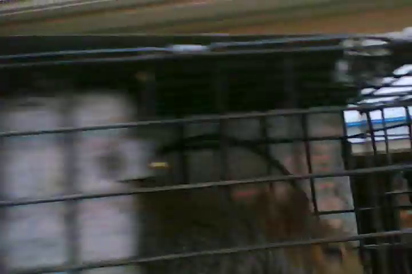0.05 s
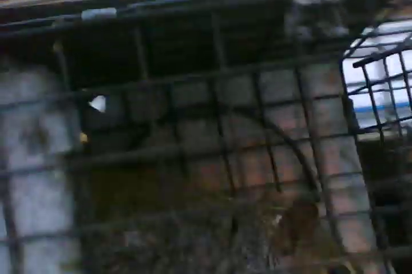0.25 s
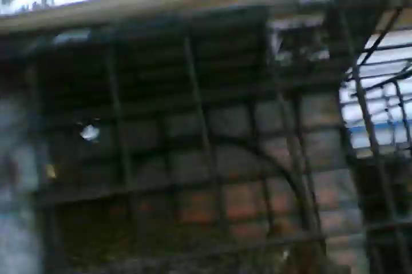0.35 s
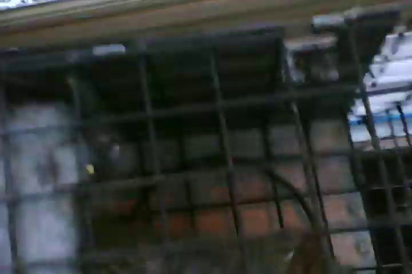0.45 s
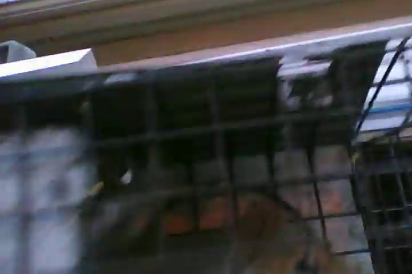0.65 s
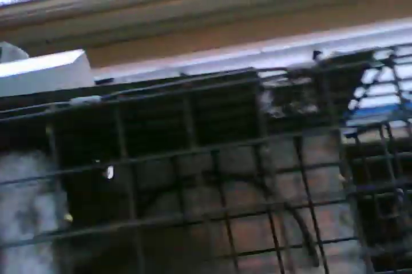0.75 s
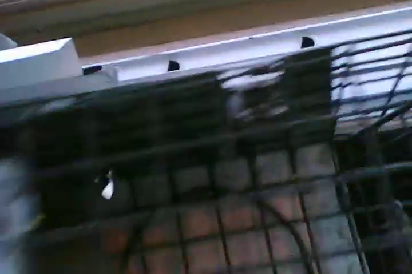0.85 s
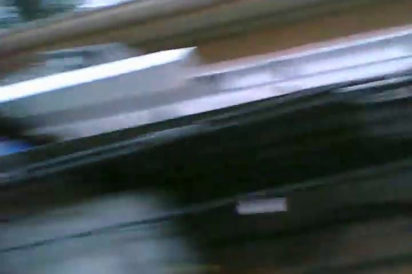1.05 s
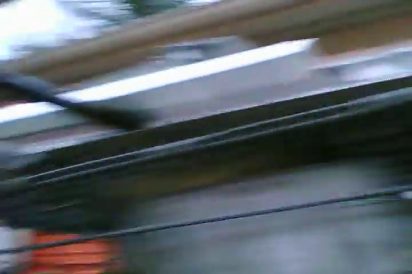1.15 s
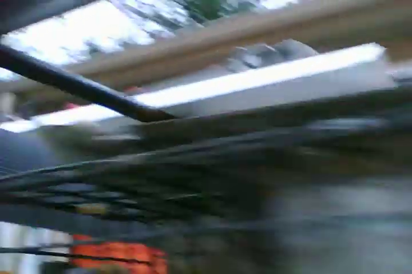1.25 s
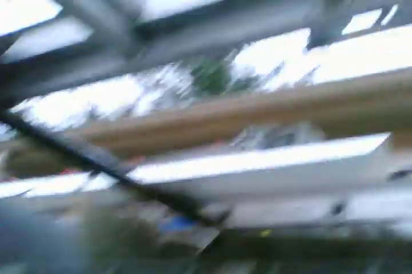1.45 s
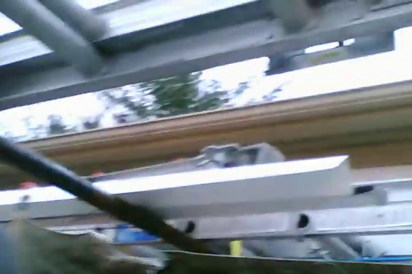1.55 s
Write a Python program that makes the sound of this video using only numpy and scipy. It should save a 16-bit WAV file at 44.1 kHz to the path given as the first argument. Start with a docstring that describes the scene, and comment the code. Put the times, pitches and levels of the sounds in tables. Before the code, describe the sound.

A wire mesh cage rattles close to the microphone over faint outdoor air. From about 0.2 seconds its door scrapes along the ringing wires with a low handling rumble, then bangs on the frame at 0.4 seconds with sharp, distorted clicks. Looser, quieter clacks follow from 0.7 seconds, with faint dry rustles and two latch clicks around 1.1 and 1.2 seconds. A last light rattle comes near 1.6 seconds.

```python
"""Outdoors, close to the microphone, a wire mesh cage is handled over a low background.
Its door scrapes and rattles along the mesh: tiny contacts set the cage ringing and single wires
are plucked. It bangs against the frame, overloading the recorder into clipping and sharp clicks.
Looser clacks, two latch clicks and faint dry rustles follow."""
import sys
import numpy as np
from scipy import signal
from scipy.fft import rfft, irfft
from scipy.io import wavfile

SR = 44100
rng = np.random.default_rng(int(sys.argv[2]) if len(sys.argv) > 2 else 0)


def to_wav(s):
    """Save 16-bit WAV."""
    ch = np.atleast_2d(s).T  # columns
    pcm = np.round(np.clip(ch, -1, 1) * 32767)  # PCM
    wavfile.write(sys.argv[1], SR, pcm.astype(np.int16))


N = 70560

# Colour of the outdoor air: (frequency [Hz], relative level [dB])
AIR_SPECTRUM = [(8, 14), (25, 3), (50, -3.5), (120, -5), (250, -10.5), (400, -13.5), (550, -11.5),
                (900, -15.5), (1700, -18), (2800, -26.5), (4100, -29), (4900, -37), (11000, -42.5)]
# Rise and fall of the air: (time [s], level [dB])
AIR_LEVELS = [(0, -31.5), (.6, -37), (1.2, -32.5), (1.4, -36), (1.6, -34)]
# Handling rumble: (time [s], level [dB])
RUMBLE_LEVELS = [(0, -40.5), (.25, -34.5), (.45, -33), (.65, -54), (1.3, -54.5), (1.6, -48)]
# Band of the rumble: (low edge [Hz], high edge [Hz])
RUMBLE_BAND = [13, 71]
# Colour of crackles and rustles: (frequency [Hz], relative level [dB])
RUSTLE_SPECTRUM = [(500, -56), (2000, -1), (4000, 5), (6000, -5), (9500, 8), (12000, -7)]
# Dry rustles: (time [s], relative level [dB], t60 [s])
DRY_RUSTLES = [(.031, -49.5, 0.037), (.101, -49, 0.054), (1.035, -58, .02), (1.045, -50, .02),
               (1.087, -51, 0.075), (1.160, -52, 0.022), (1.333, -47, 0.027), (1.497, -39.5, 0.028)]
# Door knocking on the mesh: (time [s], base rise [s], base t60 [s],
# relative levels of frame [dB], mesh [dB], wire [dB], sizzle [dB])
DOOR_KNOCKS = [(.140, 0.0036, .30, -42, -42.5, -43, -42.5),
               (0.1758, 0.00052, 0.5, -36.5, -33.5, -35.5, -38.5),
               (.216, 0.0012, 0.079, -24, -21, -20.5, -24.5), (.232, 0.0079, 0.9, -29, -28.5, -33, -45),
               (.264, 0.011, 0.16, -25, -17.5, -20.5, -32), (.308, 0.0049, 0.13, -24.5, -22.5, -23, -30.5),
               (.342, 0.00033, 0.095, -22.5, -14.5, -25, -26.5),
               (.352, 0.002, 0.14, -15.5, -12.5, -20, -26), (.376, 0.0049, 0.1, -20, -16.5, -32, -34.5),
               (.411, 0.00064, 0.061, -17.5, -15.5, -27, -31), (.449, .003, 0.049, -27, -25, -32, -46),
               (.529, 0.0059, 0.15, -31, -30, -40.5, -44), (.594, 0.0079, 0.33, -39, -37.5, -40.5, -52.5),
               (.694, 0.0034, 0.41, -37, -40, -42, -53.5),
               (.7145, 0.00081, 0.066, -30, -24.5, -27.5, -32.5), (.729, 0.003, 0.11, -27, -29, -37, -40.5),
               (.824, 0.005, 0.12, -37, -44, -60, -75), (.851, 0.0089, 0.17, -40, -34, -41.5, -52.5),
               (0.915, 0.0076, .06, -45, -33, -52, -40), (.921, 0.0019, 0.073, -28.5, -27.5, -30, -37.5),
               (1.008, 0.0026, 0.068, -43, -31.5, -32.5, -45), (1.106, 0.0086, 0.097, -25, -29.5, -32, -37),
               (1.140, 0.0034, 0.42, -34, -44.5, -51.5, -66), (1.180, 0.0033, 0.17, -37, -37, -49, -53),
               (1.241, 0.0018, 0.095, -33.5, -30.5, -35, -38.5), (1.562, 0.016, 0.58, -40, -31.5, -33, -43),
               (1.586, 0.0082, .20, -60, -30.5, -34.5, -42)]
# Band centres of a knock: (frame [Hz], mesh [Hz], wire [Hz], sizzle [Hz])
BAND_CENTRES = [480, 1600, 3700, 7000]
# Stretch of the decay in each of those bands: (t60 factor [ratio])
BAND_STRETCH = [1.15, 1.09, 1.235, 1.06]
# Heavy parts take longer to get going; for each band: (extra rise [s])
BAND_LAGS = [0.0051, 0.00043, 0.00022, 0.00015]
# Colour of the dense mesh ringing: (frequency [Hz], relative level [dB])
MESH_SPECTRUM = [(60, -13.5), (170, -3.5), (330, -0.5), (560, 4), (880, -1), (1250, 5.5), (1900, 1),
                 (2350, 2), (2750, -6.5), (3300, -1.5), (4150, -1), (4750, -25), (5500, -0.5), (6300, -5),
                 (7300, -11), (9000, -8.5), (11000, -14.5), (13000, -13)]
# Clear modes of the cage: (frequency [Hz], relative level [dB], t60 [s])
CAGE_MODES = [(165.4, -10, 0.198), (256.5, -12.5, 0.41), (462.3, -6, 0.3), (520.3, -7.5, 0.28),
              (591, -5, 0.34), (693.4, -7, 0.34), (1207, -9, 0.26), (1260, -6.5, 0.072), (1325, -22, 0.068),
              (1426, -19, 0.074), (1644, -16, 0.085), (2076, -15, .15), (2310, -6, 0.054), (2293, -14, 0.3),
              (3860, -11, 0.26), (4180, -7, 0.085)]
# Wires plucked as the door slides past: (time [s], pitch [Hz], level [dB], t60 [s])
WIRE_PLUCKS = [(.144, 3950, -34, .1), (.308, 4225, -23.5, 0.14), (.729, 591, -24.5, 0.16),
               (1.113, 546, -23.5, 0.13), (1.118, 1380, -30, .14), (1.2425, 2350, -26, 0.093),
               (1.568, 1626, -29.5, 0.12), (1.575, 1903, -33.5, .2)]
# Sharp clicks of the recorder overloading on the hardest blows:
# (time [s], pitch [Hz], level [dB], t60 [s])
OVERLOAD_CLICKS = [(.3573, 3800, -26, .0016), (.3579, 6070, 4.5, 0.0015), (.3583, 8800, 1.5, 0.00082),
                   (.4135, 3630, 12, .001), (.4139, 9400, 3.5, 0.00065), (.4162, 6020, 7.5, 0.0004)]
# Door hitting the frame: (time [s], push level [dB], push pitch [Hz], panel gain [dB])
DOOR_BANGS = [(.3925, -7, 192, -25), (.3968, -4.5, 119, -13), (.4115, -7, 576, -16)]
# Modes of the door panel: (frequency [Hz], relative level [dB], t60 [s])
PANEL_MODES = [(171, -3.5, 0.17), (200.5, -3.5, 0.085), (300, -1.5, .1), (414, -8, 0.067),
               (441, -10.5, 0.45), (475, 7, 0.039), (574, 5, 0.052), (591, -9, 0.49), (615, 4, .12),
               (710, -32, 0.047), (727, -13, 0.059)]
# Latch clicks: (time [s], gain [dB])
LATCH_CLICKS = [(1.068, -28.5), (1.183, -19)]
# Modes of the latch: (frequency [Hz], relative level [dB], t60 [s])
LATCH_MODES = [(2100, -1, 0.014), (2380, 1, 0.017), (3130, -9, .03), (3730, 0, 0.014), (3970, -7, 0.015),
               (6200, -15, 0.021)]


def amp(db):
    """Decibels to gain."""
    return 10 ** (np.maximum(db, -300) / 20)


def unit(x):
    """Scales to rms 1."""
    return x / np.sqrt(np.mean(x ** 2) + 1e-20)


def gains(spectrum, hz):
    """Reads a spectrum in dB as gains at the given frequencies."""
    points_hz, db = np.transpose(spectrum)
    return amp(np.interp(np.log(hz + 1), np.log(points_hz), db))


def colour(x, spectrum):
    """Filters a signal by a spectrum, at rms 1."""
    hz = np.fft.rfftfreq(len(x), 1 / SR)
    return unit(irfft(rfft(x) * gains(spectrum, hz), len(x)))


def contacts(size, per_s, spread=0.43):
    """Random tiny impacts of uneven strength."""
    strength = np.sign(rng.standard_normal(size)) * (1 + spread * rng.standard_normal(size))
    return unit(strength * (rng.random(size) < per_s / SR))


def ring(modes, t, spread_db=1.2):
    """Dying modes, shared out a little differently by every blow."""
    hz, db, t60 = np.transpose(modes)[:, :, None]
    phase = rng.random(hz.shape)
    struck_db = db + spread_db * rng.standard_normal(hz.shape)
    return (amp(struck_db - 60 * t / t60) * np.sin(2 * np.pi * (hz * t + phase))).sum(0)


def background():
    """The bed under the cage: outdoor air, handling rumble and a faint crackle."""
    t = np.arange(N) / SR
    air_gain = amp(np.interp(t, *np.transpose(AIR_LEVELS)))
    air = colour(rng.standard_normal(N), AIR_SPECTRUM)
    rumble_gain = amp(np.interp(t, *np.transpose(RUMBLE_LEVELS)))
    rumble_filter = signal.butter(2, RUMBLE_BAND, "band", fs=SR, output="sos")
    rumble = unit(signal.sosfilt(rumble_filter, rng.standard_normal(N)))
    crackle = colour(contacts(N, per_s=36), RUSTLE_SPECTRUM)
    return air_gain * air + rumble_gain * rumble + amp(-64.5) * crackle


def rustle(db, t60):
    """A short clump of dry crackles."""
    t = np.arange(SR // 10) / SR
    return amp(db + 5.5 - 60 * t / t60) * colour(contacts(len(t), per_s=5800), RUSTLE_SPECTRUM)


def mesh_knock(rise_s, t60, *levels_db, tail_db=-16, base_tail_t60=0.33):
    """A burst of wire contacts sets the dense mesh and the clear cage modes ringing."""
    t = np.arange(SR // 2) / SR
    hz = np.fft.rfftfreq(len(t), 1 / SR)
    chatter = amp(-1.5) * contacts(len(t), per_s=1500)
    shiver = amp(-2) * rng.standard_normal(len(t))
    spectrum = rfft(chatter + shiver) * gains(MESH_SPECTRUM, hz)
    nearest_band = np.argmin(abs(np.log((hz[:, None] + 1) / BAND_CENTRES)), axis=1)
    mesh = np.zeros(len(t))
    for band, db in enumerate(levels_db):
        peak_s = rise_s + BAND_LAGS[band]
        age = np.maximum(t - peak_s, 0) / BAND_STRETCH[band]
        fall = amp(-60 * age / t60)
        tail = amp(tail_db - 60 * age / base_tail_t60)  # the whole cage keeps shivering
        envelope = np.minimum(t / peak_s, 1) * np.hypot(fall, tail)
        band_noise = unit(irfft(spectrum * (nearest_band == band), len(t)))
        mesh += amp(db + 0.5) * envelope * band_noise
    # Each clear mode follows the knock's level at its own pitch.
    modes = [(pitch, db + np.interp(np.log(pitch), np.log(BAND_CENTRES), levels_db), mode_t60)
             for pitch, db, mode_t60 in CAGE_MODES]
    return mesh + amp(-1.5) * np.minimum(t / rise_s, 1) * ring(modes, t)


def ping(hz, db, t60):
    """A damped sine: a plucked wire, a brief overload click or the door's push."""
    t = np.arange(SR // 2) / SR
    return amp(db - 60 * t / t60) * np.sin(2 * np.pi * hz * t)


def door_bang(push_db, push_hz, panel_db, rise_s=0.00215):
    """The door stops on the frame: a short heavy push, and its panel rings."""
    t = np.arange(SR // 2) / SR
    push = ping(push_hz, push_db, t60=0.042)
    panel = amp(panel_db) * np.minimum(t / rise_s, 1) * ring(PANEL_MODES, t)
    return push + panel


def latch_click(db, rise_s=0.001, grit_db=-3, grit_t60=0.014):
    """The small latch catches with a gritty scrape and rings briefly."""
    t = np.arange(SR // 10) / SR
    grit = amp(grit_db - 60 * t / grit_t60) * colour(rng.standard_normal(len(t)), MESH_SPECTRUM)
    return amp(db) * np.minimum(t / rise_s, 1) * (ring(LATCH_MODES, t) + grit)


def scene():
    """The cage up close over the outdoor background, in mono."""
    mix = background()
    sources = [(DRY_RUSTLES, rustle), (DOOR_KNOCKS, mesh_knock), (WIRE_PLUCKS, ping),
               (OVERLOAD_CLICKS, ping), (DOOR_BANGS, door_bang), (LATCH_CLICKS, latch_click)]
    for events, source in sources:
        for time_s, *settings in events:
            start = round(time_s * SR)
            sound = source(*settings)[:N - start]
            mix[start:start + len(sound)] += sound
    return mix[None]


def record(dry, mic_edge_hz=11370, clip_level=0.78, band_limit_hz=16800):
    """The close microphone loses the top treble and clips on the hardest blows; a low-pass follows."""
    mic_filter = signal.firwin(101, mic_edge_hz, window=("kaiser", 7), fs=SR)
    band_filter = signal.firwin(511, band_limit_hz, window=("kaiser", 9), fs=SR)
    heard = signal.oaconvolve(dry, mic_filter[None], "same")
    clipped = np.clip(heard, -clip_level, clip_level)
    return signal.oaconvolve(clipped, band_filter[None], "same")


dry = scene()
out = record(dry)
to_wav(out)
```